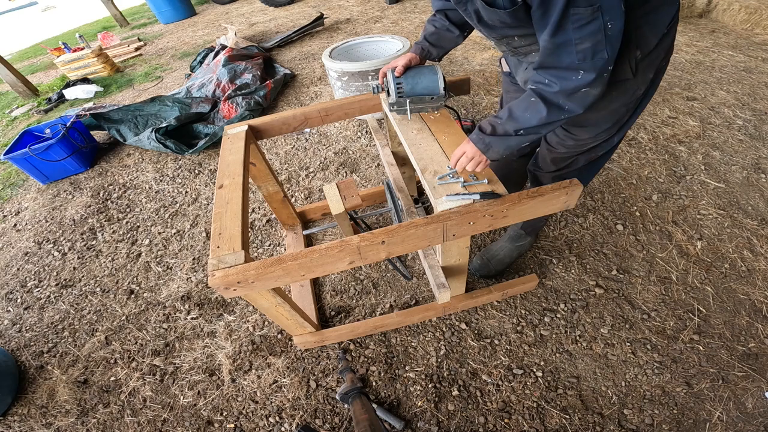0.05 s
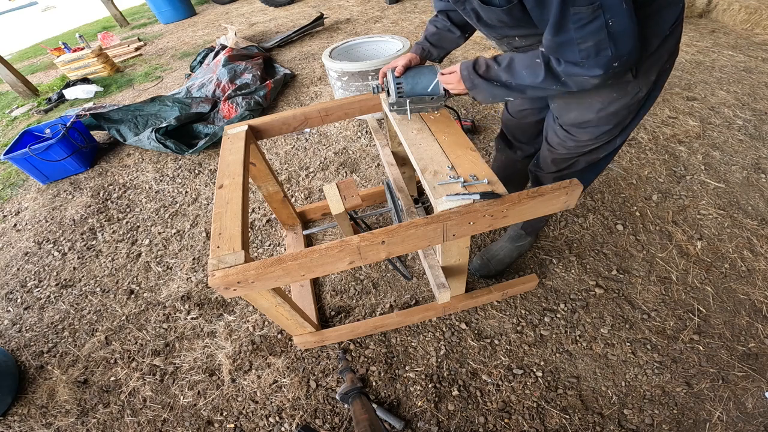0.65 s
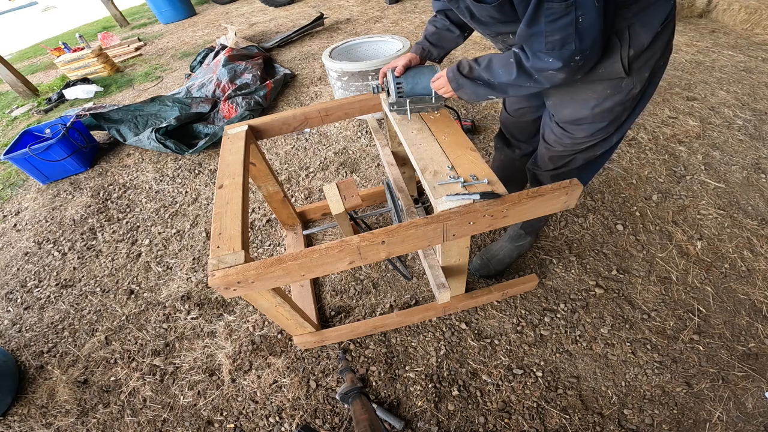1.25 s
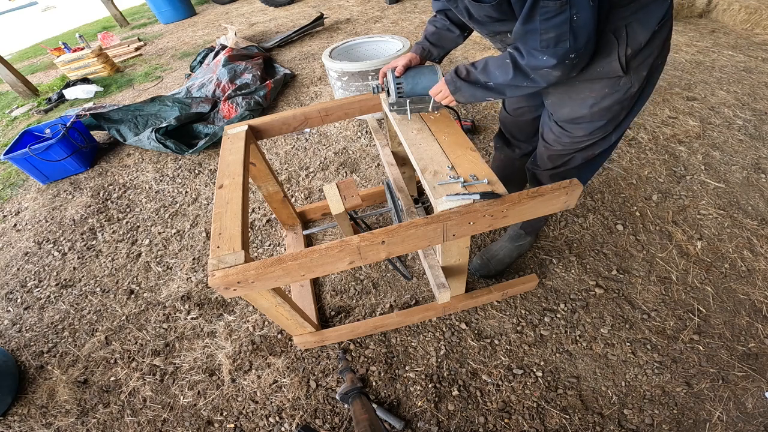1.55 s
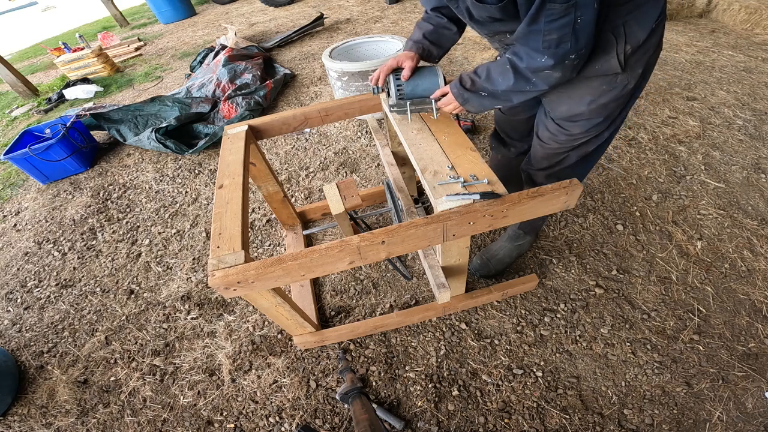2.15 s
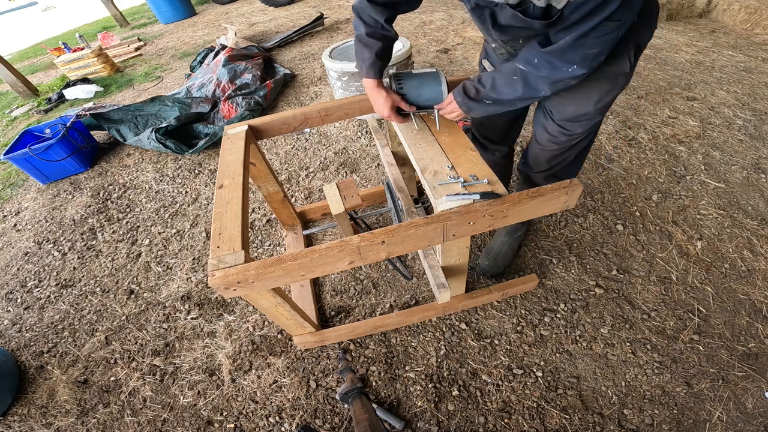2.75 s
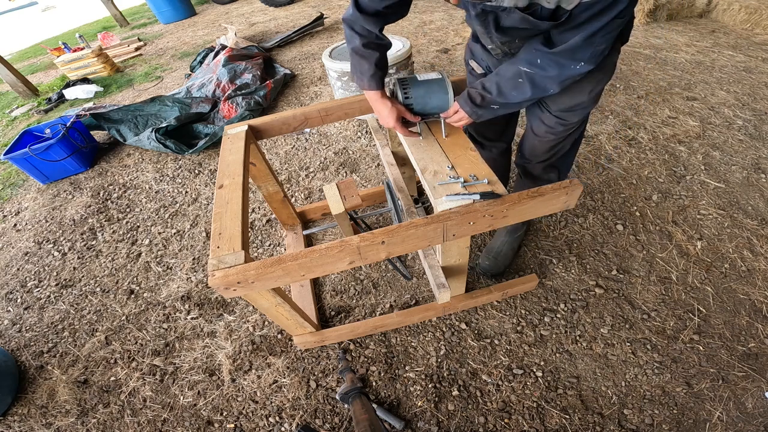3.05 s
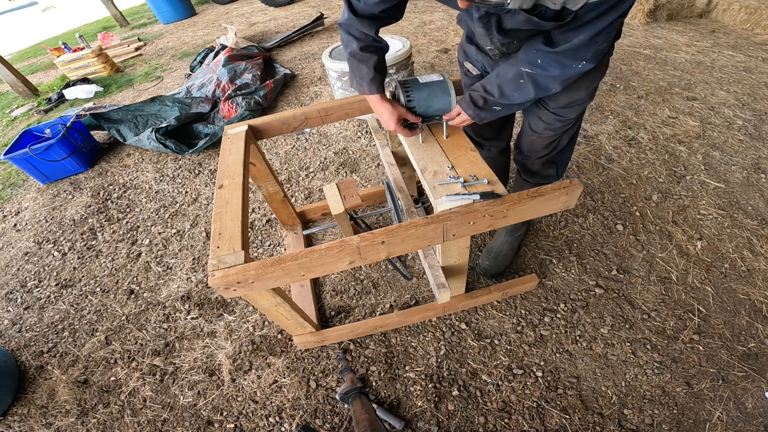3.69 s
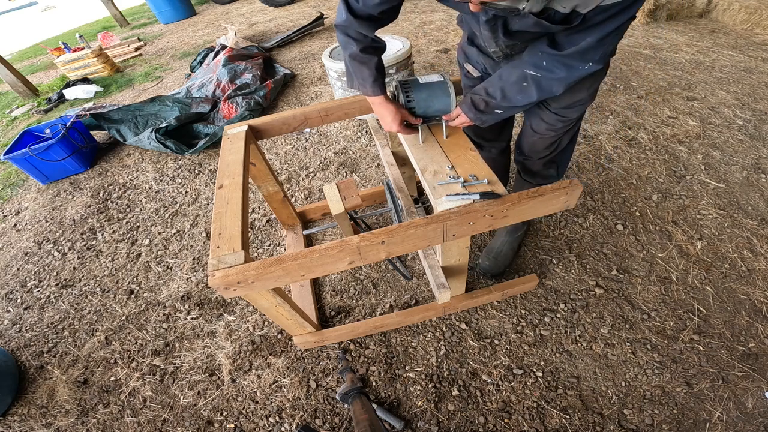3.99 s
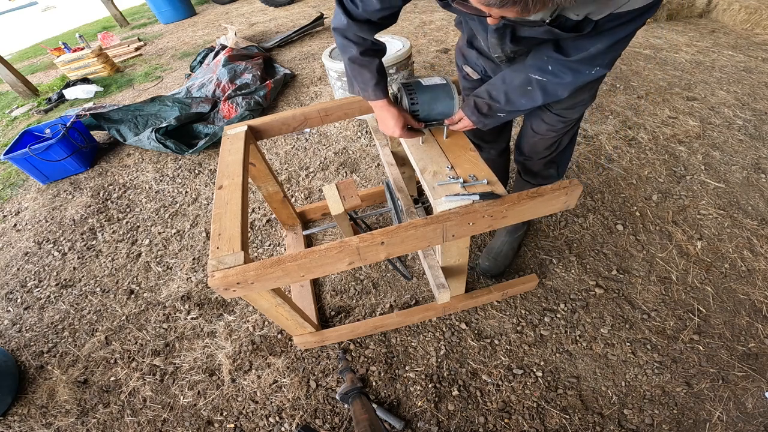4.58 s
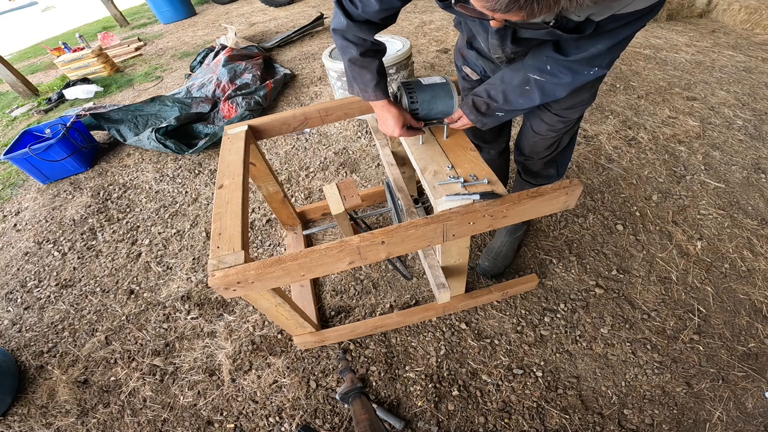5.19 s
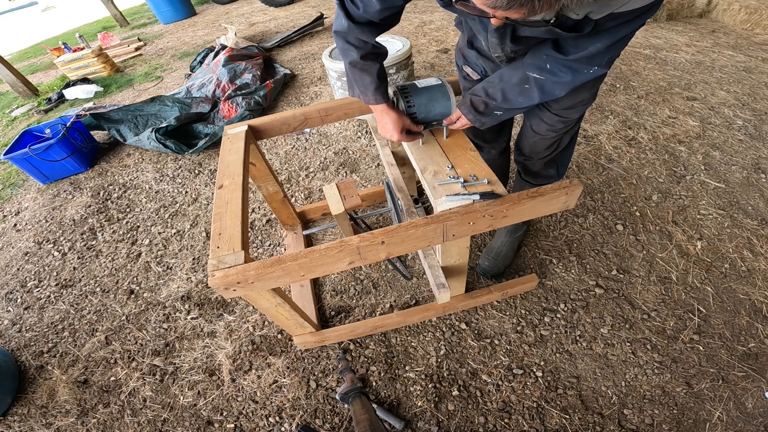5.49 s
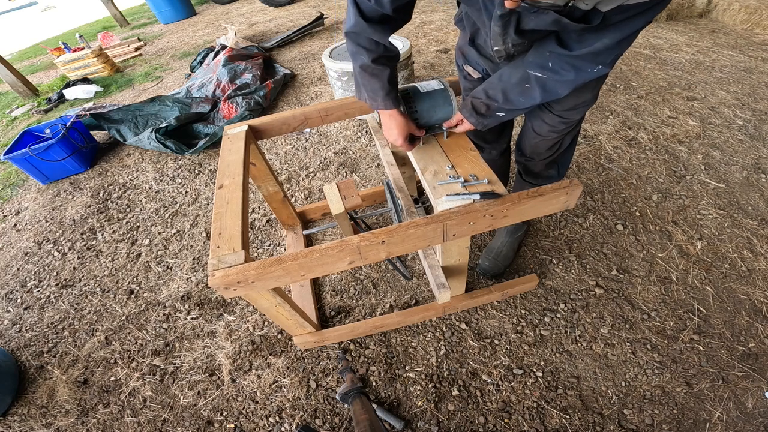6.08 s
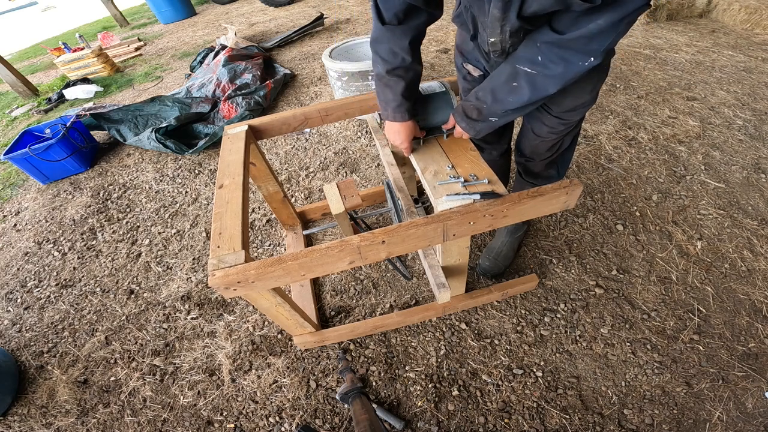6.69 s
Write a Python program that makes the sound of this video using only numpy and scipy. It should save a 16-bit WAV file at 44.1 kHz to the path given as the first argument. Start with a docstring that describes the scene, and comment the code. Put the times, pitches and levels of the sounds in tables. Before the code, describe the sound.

A heavy metal motor clatters onto a wooden board and is scraped into place, ending with a sharp metallic knock.

```python
"""In an open shed, over faint outdoor air, bolts clink softly and grit ticks. A heavy electric motor
is set down on the board of a wooden frame, where it rocks and clatters on its steel foot. Sleeves
rustle as it is scraped into place in short shoves; a boot thumps on the earth, and the slipping foot
makes the frame groan. Last, fingers slide on steel and a bolt snaps home with a sharp knock.
All along, the roof throws the knocks back."""
import sys
import numpy as np
from scipy import signal
from scipy.fft import rfft, irfft
from scipy.io import wavfile
from scipy.ndimage import uniform_filter1d

SR = 44100
rng = np.random.default_rng(int(sys.argv[2]) if len(sys.argv) > 2 else 0)


def log_audio(samples):
    """Write samples as a 16-bit WAV file to the path given in sys.argv[1]."""
    # one column per channel
    frames = np.atleast_2d(samples).T
    # limit to full scale, then quantise
    limited = np.clip(frames, -1, 1)
    pcm = np.round(limited * 32767).astype(np.int16)
    wavfile.write(sys.argv[1], SR, pcm)


N = 306054
TIME = np.arange(N) / SR

# The notes of the struck board. Each row: pitch in Hz, level in dB, longest ring time in seconds.
BOARD_NOTES = [(230.5, -6, 0.13), (307, -11, 0.13), (456, -2.5, 0.027), (579.3, -5.5, 0.049),
               (657, -15.5, 0.072), (783, -5.5, 0.04), (975, -5, 0.035), (1084, -9, 0.18),
               (1406, -2, 0.064), (1670, -11.5, 0.088), (2580, 3.5, 0.012), (3280, 8.5, 0.0067),
               (3900, -7.5, 0.024), (5202, 3.5, 0.054), (5860, 3.5, 0.09), (6040, -4, .03),
               (7324, -6.5, .04)]
# Dust or skin sliding on steel. Each row: frequency in Hz, level in dB.
DRY_HISS = [(1500, -13.5), (5000, -2), (6500, 0.5), (8000, -6), (12000, -15)]
# Four bands, low to high: thud, clack, crack, fizz. Each row: lower edge in Hz, upper edge in Hz.
BANDS = [(130, 500), (500, 2000), (2000, 8000), (8000, 14000)]


def amp(db):
    """Turns decibels into a gain."""
    return 10 ** (np.asarray(db) / 20)


def unit(x):
    """Scales a sound to an average (rms) strength of 1."""
    return x / np.sqrt(np.mean(x ** 2) + 1e-20)


def read(points, hz):
    """Looks up a frequency on a curve drawn through the points."""
    f, value = np.transpose(points)
    return np.interp(np.log(hz + 1), np.log(f + 1), value)


def add(mix, s, sound):
    """Mixes a sound in, starting at s seconds."""
    part = mix[max(round(s * SR), 0):][:len(sound)]
    part += sound[:len(part)]


def colour(x, points):
    """Turns frequencies up or down. Each point: frequency in Hz, gain in dB."""
    size = x.shape[-1]
    return irfft(rfft(x) * amp(read(points, np.fft.rfftfreq(size, 1 / SR))), size)


def noise(points, size=N):
    """Noise of strength 1, coloured by the points."""
    return unit(colour(rng.standard_normal(size), points))


def die_away(x, ring_times):
    """Fades each frequency at its own speed. Each point: frequency in Hz, seconds to fall 60 dB."""
    hz, t, spectrum = signal.stft(x, SR, nperseg=128)
    fade = amp(-60 * t / read(ring_times, hz)[:, None])
    return signal.istft(spectrum * fade, SR, nperseg=128)[1][..., :x.shape[-1]]


def split(x):
    """Splits a sound into thud, clack, crack and fizz."""
    filters = [signal.butter(3, band, "band", fs=SR, output="sos") for band in BANDS]
    return [signal.sosfiltfilt(sos, x, padtype=None) for sos in filters]


def contact(hardness, soft_hz=1493, hard_hz=12000, steepness=6.37):
    """Each band's gain in dB: a soft contact lasts longer and passes less treble."""
    corner_hz = soft_hz * (hard_hz / soft_hz) ** hardness
    centres = np.sqrt(np.prod(BANDS, 1))
    return -10 * np.log10(1 + (centres / corner_hz) ** steepness)


def tilted(db_per_octave):
    """Each band's gain in dB for a brighter or duller sound; the clack stays as it is."""
    centres = np.sqrt(np.prod(BANDS, 1))
    return db_per_octave * np.log2(centres / centres[1])


def ring(notes, dense_db, pitch=1, scatter_db=2, loss=0.022, size=13000):
    """A tapped body rings; the spot that is hit sets how strongly each note sounds."""
    # The dense, lesser notes between the main ones. Each row: frequency in Hz, level in dB.
    dense_colour = [(60, -30), (150, -13), (230, 1), (500, -2), (1400, -1), (2000, -6), (3500, -3),
                    (6200, -4), (7000, -11), (9000, -12), (15000, -22)]
    # How long they last. Each row: frequency in Hz, ring time in seconds.
    dense_times = [(200, .11), (900, .06), (2000, .033), (12000, .024)]
    t = np.arange(size) / SR
    hz, db, ring_s = np.transpose(notes)[:, :, None]
    ring_s = np.minimum(ring_s, np.log(1000) / (np.pi * loss * hz))  # hands and board damp the notes
    chance = rng.standard_normal((len(notes), 2))
    strength = np.sign(chance[:, :1]) * amp(db + scatter_db * chance[:, 1:] - 60 * t / ring_s)
    tones = strength * np.sin(2 * np.pi * hz * pitch * t)
    return tones.sum(0) + amp(dense_db) * die_away(noise(dense_colour, size), dense_times)


def strike(s, body, levels_db, size=441):
    """Places a blow at s seconds, setting each band's level by its first moments."""
    out, lead = np.zeros(N), size // 6
    fade_in = np.minimum(np.arange(len(body) + lead) / lead, 1)
    for part, db in zip(split(np.pad(body, (size, 0))), levels_db):
        add(out, s - lead / SR, amp(db) * fade_in * part[size - lead:] / np.std(part[size:2 * size]))
    return out


def slips(per_s, spread_db, smooth):
    """Sticking and slipping: random catches of uneven size over a smooth rubbing noise."""
    sizes = amp(spread_db * np.minimum(rng.exponential(1, N), 3.5)) * rng.choice([-1, 1], N)
    catches = sizes * (rng.random(N) < per_s / SR)
    return unit(catches) + smooth * rng.standard_normal(N)


def steadied(x, size=1500):
    """Holds a sound's strength near 1 from moment to moment."""
    return x / np.sqrt(np.abs(uniform_filter1d(x ** 2, size)) + 1e-12)


def air(level_db=-64.4, swell_db=0.81):
    """Faint outdoor air swells a little; wind rumbles differently on the left and right."""
    # The outdoor background. Each row: frequency in Hz, level in dB.
    air_colour = [(12, -42.5), (20, -1), (74, -12.5), (108, -13.5), (183, -1.5), (328, -12), (603, -21.5),
                  (796, -20.5), (1780, -23), (3970, -33.5), (8160, -29.5), (15000, -59)]
    common, *sides = rng.standard_normal((3, N))
    swell = noise([(3, -2.5), (9, -17), (30, -99)])
    apart = colour(np.array(sides), [(30, 3), (150, 0), (1000, 6.5), (6000, 0.5)])
    return amp(level_db + swell_db * swell) * unit(colour(common + apart, air_colour))


def bolts(steel_hz=5380, housing_db=-7.5):
    """Bolts clink and the last snaps home; gives the direct sound and what spreads into the shed."""
    # Steel hits steel. Each row: start in seconds, force in dB, hardness from 0 to 1, rough pitch in Hz.
    clinks = [(0.235, -61, 1.0, 5080), (0.453, -59.5, 0.95, 4910), (0.467, -57.5, 0.95, 4850),
              (1.3309, -36.5, 0.6, 4400), (6.49, -47.5, 0.7, 4400), (6.5002, -17.5, 1, 5390)]
    # A bolt in the motor's foot. Each row: pitch in Hz, level in dB, longest ring time in seconds.
    steel_notes = [(227, -11.5, 0.22), (280.4, -19, 0.6), (880, -17, 0.15), (1492, -6, 0.12),
                   (1850, -8.5, 0.12), (2394, -15, .045), (3507, -9.5, 0.0096), (4960, 2.5, 0.0089),
                   (5356, 7, 0.051), (6440, -15.5, 0.06), (7600, -14.5, 0.075), (11600, -18, 0.037)]
    # What the motor's housing sends out sideways. Each row: frequency in Hz, level in dB.
    housing_colour = [(140, -6), (215, 11), (290, 12), (420, -2), (2000, -2), (2480, 2), (4000, -8),
                      (5000, 1), (5900, 1), (6900, -10), (7600, -5), (8600, -23), (10500, -16),
                      (14000, -30)]
    direct, outward = np.zeros((2, N))
    for s, force_db, hardness, hz in clinks:
        levels_db = force_db + np.array([-15, -13.5, 0, -13.5]) + contact(hardness)
        steel = ring(steel_notes, dense_db=-2, pitch=hz / steel_hz, scatter_db=1)
        direct += strike(s, steel, levels_db)
        housing = die_away(noise(housing_colour, 3000), [(250, 0.1), (1500, 0.091), (5000, 0.045)])
        outward += amp(housing_db) * strike(s, housing, levels_db)
    return direct, outward


def ticks():
    """Grit cracks under the foot and fingers tick, with almost no ring."""
    # Small dry ticks. Each row: start in seconds, level in dB, tilt toward treble in dB per octave.
    cracks = [(0.282, -78.5, 4), (2.252, -61, -3), (2.511, -56.5, 2), (3.163, -57, .5), (3.487, -62.5, 0.5),
              (3.587, -70, -9), (4.758, -64.5, -3), (5.553, -61.5, -0.5), (5.663, -53, -1),
              (6.076, -63, -3), (6.305, -53, 1), (6.363, -54, -2), (6.41, -60, -1), (6.758, -73, 3.5)]
    # Cracking grit. Each row: frequency in Hz, level in dB.
    grit_colour = [(60, -23.5), (250, -19), (6000, 5.5), (10500, 3.5), (15000, -14.5)]
    # A tick's balance: gains in dB for thud, clack, crack and fizz.
    balance_db = [-3, 0, -2, -5]
    out = np.zeros(N)
    for s, db, tilt in cracks:
        crack = die_away(noise(grit_colour, 4000), [(250, 0.03), (1500, 0.091), (6000, 0.018)])
        out += strike(s, crack, db + np.array(balance_db) + tilted(tilt))
    return out


def clatter(dull_hz=900, bright_hz=5000, firm=0.29, hollow_hz=940, hollow_db=5.5):
    """The motor rocks from corner to corner on the board, then bumps as it is shoved."""
    # The foot's knocks. Each row: start in seconds, force in dB, hardness from 0 to 1.
    knocks = [(0.484, -54.5, 0.34), (0.953, -56, 0.74), (0.964, -28.5, 0.96), (0.9778, -35.5, .62),
              (0.989, -36.5, 0.75), (0.998, -30, .78), (1.165, -31, 0.24), (1.184, -30, 0.5),
              (1.195, -28, 0.43), (1.208, -31.5, 0.37), (1.374, -30.5, 0.44), (1.386, -34, 0.55),
              (1.3989, -28.5, 0.63), (1.4205, -27, 0.56), (1.47, -34.5, 0.21), (1.494, -30.5, 0.04),
              (1.5844, -33, 0.11), (1.6, -31.5, 0.09), (1.63, -34, 0.14), (1.641, -34.5, .16),
              (1.66, -25, 0.74), (1.7455, -33, 0.32), (1.754, -33, 0.16), (1.81, -39, 0.26),
              (1.82, -43.5, 0.27), (2.603, -42, .02), (2.66, -45, 0.05), (2.809, -42, 0.52),
              (2.908, -49, 0.21), (3.881, -36, 0.13), (4.168, -47, .32), (4.609, -56, 0.23),
              (5.138, -51.5, 0.15), (5.162, -56.5, 0.1), (5.301, -57.5, 0.12)]
    # The thud grows as the weight comes to rest. Each row: time in seconds, thud gain in dB.
    weight = [(1.0, -14), (1.4, -9), (1.8, -11.5), (4.0, -8.5), (5.0, 8)]
    pitches = rng.uniform(0.975, 1.025, len(knocks))  # the shifting weight detunes the board
    hollow_filter = signal.iirpeak(hollow_hz, Q=2.9, fs=SR)
    out = np.zeros(N)
    for (s, force_db, hardness), pitch in zip(knocks, pitches):
        thud_db = np.interp(s, *np.transpose(weight))
        balance_db = np.array([thud_db, 0, 3.5, -1.5])
        softness = np.clip(1 - hardness / firm, 0, 1)  # a soft blow sounds hollower and duller
        wood = ring(BOARD_NOTES, dense_db=5, pitch=pitch, scatter_db=3)
        wood = wood + softness * amp(hollow_db) * signal.lfilter(*hollow_filter, wood)
        cutoff_hz = bright_hz * (dull_hz / bright_hz) ** softness
        blow = signal.lfilter(*signal.butter(1, cutoff_hz, fs=SR), wood)
        out += strike(s, blow, force_db + balance_db + contact(hardness))
    return colour(out, [(90, -17.5), (180, -1.5)])  # a narrow board gives off little bass


def sleeves_and_hands():
    """Cloth swishes and hands rub on the housing; near the end, fingers hiss over steel."""
    # Arm movements. Each row: middle in seconds, half length in seconds, relative level in dB.
    moves = [(2.254, 0.16, -81), (2.431, 0.035, -68.5), (2.604, 0.29, -87.5), (2.95, 0.17, -80),
             (3.352, 0.039, -81.5), (3.513, 0.098, -80.5), (3.722, 0.037, -78.5), (4.0, 0.13, -87),
             (4.278, 0.12, -76), (5.45, .15, -89.5), (6.116, 0.041, -77), (6.25, .06, -85),
             (6.414, 0.061, -71), (6.698, 0.13, -79.5)]
    # Swishing cloth. Each row: frequency in Hz, level in dB.
    cloth_colour = [(1000, -30.5), (2500, -2.5), (6000, 3.5), (9000, -7), (11500, -6), (13500, -16.5),
                    (15000, -17.5)]
    # Rubbing hands. Each row: frequency in Hz, level in dB.
    skin_colour = [(80, -27.5), (280, 8), (550, -3.5), (1600, 5), (2600, -19), (6000, -60)]
    # Fingers sliding on steel. Each row: time in seconds, relative level in dB.
    finger_slide = [(6.06, -82), (6.346, -66.5), (6.47, -74.5)]
    motion = sum(amp(db) * np.exp(-((TIME - s) / half) ** 2) for s, half, db in moves)
    cloth = unit(colour(slips(per_s=2400, spread_db=3, smooth=0.87), cloth_colour))
    skin = noise(skin_colour)
    folds = amp(2.2 * noise([(12, -1), (35, -21.5), (100, -88.5)]))  # cloth catches and lets go
    finger_db = np.interp(TIME, *np.transpose(finger_slide), left=-120, right=-120)
    fingers = amp(finger_db + 3.5) * noise(DRY_HISS)
    return folds * (motion * (amp(8.5) * cloth + amp(13) * skin) + fingers)


def pushes(swell_db=24, sag_db_per_s=11.5, release_db_per_s=304):
    """Each shove swells, sags and lets go; gives the gains of judder, grind, grit and dust."""
    # Shoves along the board. Each row: start, rise and hold in seconds, force in dB,
    # tilt toward treble in dB per octave, dust level next to the grit in dB.
    shoves = [(2.39, 0.054, .22, -53, 0.5, -12), (2.755, 0.021, .05, -44.5, 1.2, -19),
              (2.841, 0.032, .08, -55.5, 1.5, -15), (3.72, .03, .08, -67, -1.5, -12),
              (3.826, 0.038, 0.054, -44, 0, -14), (4.01, 0.049, .04, -41.5, -1.5, -18.5),
              (4.125, 0.031, .015, -44, -2, -22), (4.55, 0.042, .02, -54, -5, -6),
              (5.513, 0.044, .11, -63.5, -4.5, 2), (5.645, 0.06, 0.018, -41.5, 1.5, -19)]
    growth = [1, 1, 1.31, 1.31]  # grit and dust need pressure: they come and go faster than the push
    gains = np.zeros((4, N))
    for start, rise, hold, force_db, tilt, dust_db in shoves:
        t = TIME - start - rise
        push_db = swell_db * np.minimum(t / rise, 0) - sag_db_per_s * np.maximum(t, 0)
        push_db -= release_db_per_s * np.maximum(t - hold, 0)
        low, middle, high, _ = force_db + tilted(tilt)
        full_db = np.array([low, middle, high, high + dust_db])
        gains += amp(full_db[:, None] + np.outer(growth, np.maximum(push_db, -100)))
    catch_db = 1.5 * noise([(8, -11), (25, 0.5), (60, -5.5), (200, -55)])  # the foot catches unevenly
    return gains * amp(catch_db)


def scrape(travel_per_s=2.3, spots=4):
    """The foot catches and slips on the grain; the notes it rings change as the contact travels."""
    # The rubbing of the sliding foot. Each row: frequency in Hz, level in dB.
    slide_colour = [(100, -2.5), (300, 11), (700, -5), (1400, -8), (2200, -6), (6000, -14), (11000, 3),
                    (15000, -27)]
    rubbing = colour(slips(per_s=280, spread_db=2, smooth=0.4), slide_colour)
    wood = np.zeros(N)
    for spot in range(spots):
        share = np.maximum(np.cos(2 * np.pi * (travel_per_s * TIME + spot / spots)), 0)
        wood += signal.oaconvolve(rubbing * share, ring(BOARD_NOTES, dense_db=8))[:N]
    judder, grind, grit, fizz = (steadied(part) for part in split(wood))
    crushed_dust = unit(colour(slips(per_s=1800, spread_db=6, smooth=0.5), DRY_HISS))
    low, middle, high, dust = pushes()
    return (amp(2) * low * judder + amp(-1.5) * middle * grind
            + amp(-10.5) * high * grit + dust * (crushed_dust + amp(-11) * fizz))


def thumps(size=9000):
    """A boot, and later the jolted frame, push on packed earth: short, low and crumbly."""
    # Weight lands. Each row: start in seconds, pitch in Hz, level in dB, rise in seconds.
    landings = [(2.823, 74.7, -36, 0.0057), (6.502, 60.8, -55.5, 0.02)]
    t, out = np.arange(size) / SR, np.zeros(N)
    for s, hz, db, rise in landings:
        crumble = noise([(20, -19), (130, 7), (220, -12.5), (600, -62)], size)
        pressure = amp(db) * t / rise * np.exp(1 - t / rise)
        add(out, s, pressure * (np.sin(2 * np.pi * hz * t) + 0.5 * crumble))
    return out


def groans():
    """For a moment the foot slips once with each swing of the frame, which makes a tone."""
    # Each row: loudest moment in seconds, pitch in Hz, level in dB, swell and fade in seconds.
    tones = [(4.085, 272, -40.5, 0.041, 0.015), (4.146, 303, -37, .008, 0.026),
             (4.602, 291, -50.5, 0.015, 0.089), (5.726, 228, -23.5, 0.011, 0.0078)]
    out = np.zeros(N)
    for s, hz, db, swell, fade in tones:
        jitter = unit(uniform_filter1d(rng.standard_normal(N), size=300))
        phase = 2 * np.pi * np.cumsum(hz * (1 + 0.024 * jitter)) / SR
        grip = np.exp(-np.maximum((s - TIME) / swell, (TIME - s) / fade))
        out += amp(db) * grip * unit(np.sin(phase) + 0.016 * np.sin(2 * phase))
    return out


def shed(x, gap_s=0.004, echoes_per_s=3000, shared=0.88, size=40000):
    """Scattered echoes from the roof and posts arrive after a short gap, much alike on both sides."""
    # The tone of the echo. Each row: frequency in Hz, level in dB.
    echo_colour = [(80, -4), (250, 3), (1200, 0), (2500, -6.5), (4000, -11), (5500, -6), (7600, -3.5),
                   (9000, -11), (14000, -4.5)]
    # How long it lasts. Each row: frequency in Hz, seconds to fall 60 dB.
    echo_times = [(300, 0.69), (1500, 0.4357), (3000, 0.48), (6000, 0.41), (12000, 0.3)]
    t = np.arange(size) / SR
    common, *sides = rng.standard_normal((3, size)) * (rng.random((3, size)) < echoes_per_s / SR)
    echoes = np.sqrt(shared) * common + np.sqrt(1 - shared) * np.array(sides)
    echoes = die_away(colour(echoes, echo_colour), echo_times)
    echoes *= np.clip((t - 0.0047) / 0.026 + 1, 0.25, 1) * (t > gap_s)
    echoes *= amp(-3) / np.linalg.norm(echoes[0])
    return signal.fftconvolve(x[None], echoes, axes=1)[:, :N]


def microphones(x):
    """Two close microphones hear the work from slightly to the right."""
    # Each row: frequency in Hz, level of the left side over the right in dB.
    lean = [(100, -.5), (300, -1.4), (700, -2.6), (2500, -2.6), (5500, -1.8), (13000, 2.5)]
    # Each row: frequency in Hz, how far the left wave runs ahead in radians.
    lead = [(200, -.05), (700, -.24), (1400, -.33), (2800, -.62), (5500, -.6), (8000, -.35), (12000, .3)]
    hz = np.fft.rfftfreq(N, 1 / SR)
    left = amp(read(lean, hz) / 2) * np.exp(0.5j * read(lead, hz))
    return irfft(rfft(x) * np.array([left, 1 / left]), N)


def scene():
    """All the sounds of the work, their echo in the shed, and the air."""
    steel, housing = bolts()
    motor = clatter()
    handling = scrape() + groans() + ticks() + sleeves_and_hands() + thumps()
    echo = shed(housing + amp(-12) * motor + amp(-15) * handling)
    return microphones(steel + motor + handling + echo + air())


def record(dry, top_hz=15200):
    """The microphones soften the highest treble, and the recorder cuts off what lies above it."""
    # The softened treble. Each row: frequency in Hz, gain in dB.
    soft_top = [(11000, -1), (15000, -9)]
    treble_cut = signal.firwin(511, top_hz, window=("kaiser", 9), fs=SR)
    return signal.oaconvolve(colour(dry, soft_top), treble_cut[None], "same")


dry = scene()
out = record(dry)
log_audio(out)
```